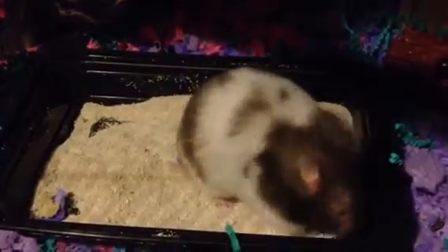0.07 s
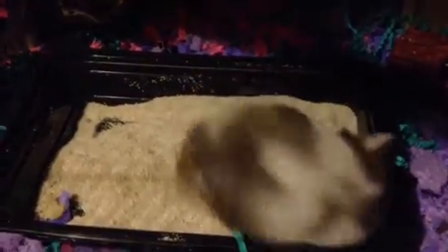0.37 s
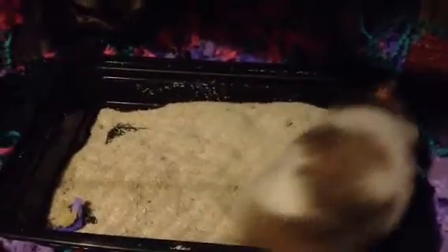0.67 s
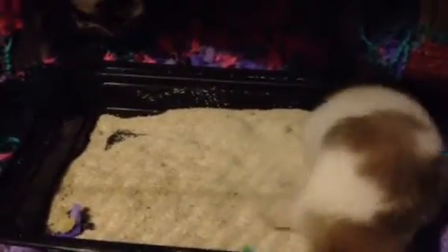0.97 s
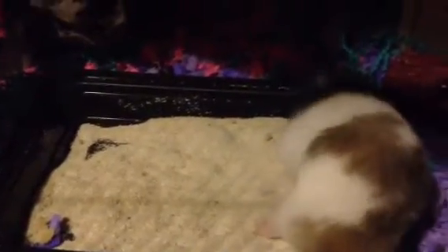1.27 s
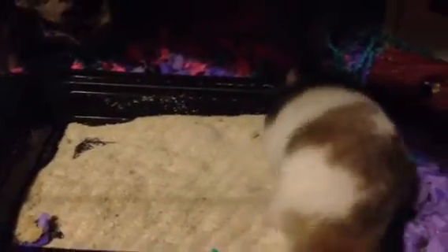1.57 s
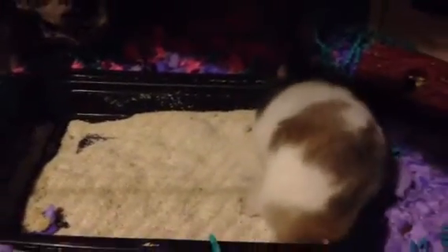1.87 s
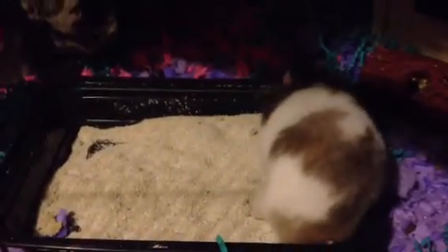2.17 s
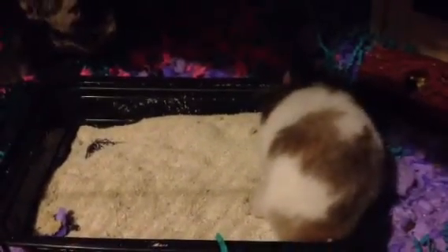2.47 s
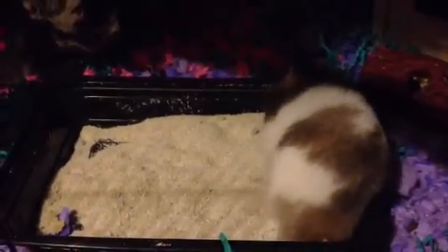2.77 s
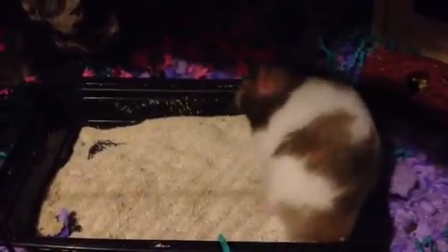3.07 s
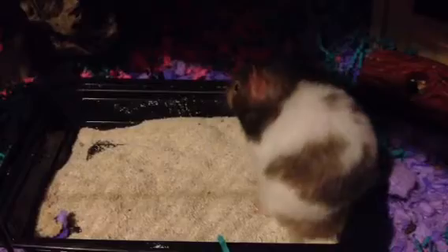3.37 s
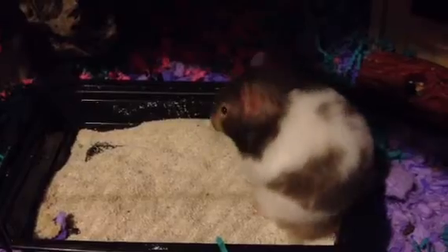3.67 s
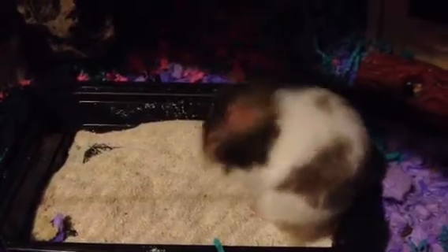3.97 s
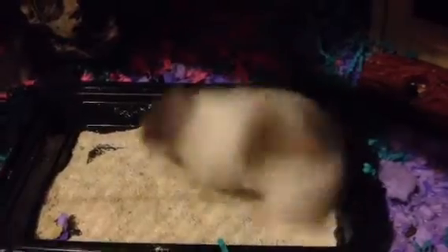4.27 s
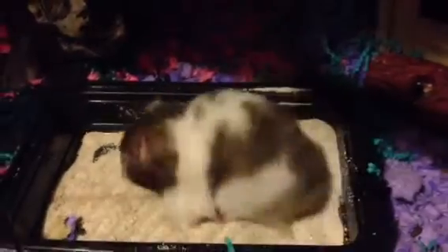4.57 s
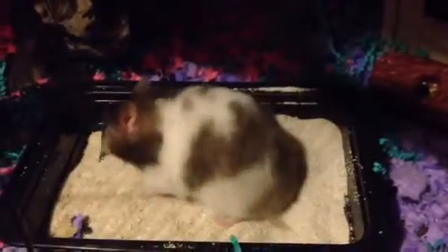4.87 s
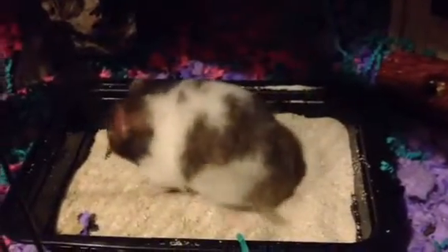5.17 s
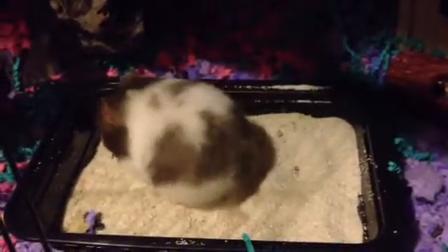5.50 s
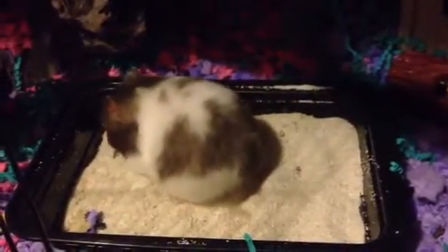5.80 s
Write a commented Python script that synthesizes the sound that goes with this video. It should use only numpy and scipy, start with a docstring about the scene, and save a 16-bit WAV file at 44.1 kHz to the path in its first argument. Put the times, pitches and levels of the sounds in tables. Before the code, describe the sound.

A hamster moves about in a thin plastic tray of dry sand, heard close up in a quiet room with a faint steady hiss. From about 0.3 to 1.3 seconds its feet push the sand in short, grainy swishes, with light claw ticks on the plastic and a sharper click near 1.4. At 1.6 seconds the tray buckles with a brief crackle and thump, the loudest sound, along with a rush of sand. After a lull, softer hollow knocks come irregularly from 2.6 to 4 seconds, mixed with faint rustling and a few clicks. Around 4.3 to 4.5 seconds the animal digs hardest, in a quick flurry of bright, hissing scrapes, followed by lighter scratches and sprinkling grains until 5. A last cluster of knocks and claw clicks falls between 5.2 and 5.4 seconds, and the sand dies away by 6.

```python
"""A hamster shuffles in a plastic tray of dry sand, close to the microphone in a quiet room.
First its feet push the sand into a hiss of tiny collisions while its claws tick on the plastic.
At 1.6 s the thin tray buckles under its weight with a loud crackle; softer knocks follow from 2.6 s.
Near 4.4 s it digs hardest, and after a last cluster of knocks at 5.4 s the sand dies away."""
import sys
import numpy as np
from scipy import signal
from scipy.fft import rfft, irfft
from scipy.io import wavfile
from scipy.ndimage import uniform_filter1d

SR = 44100
rng = np.random.default_rng(int(sys.argv[2]) if len(sys.argv) > 2 else 0)


def to_wav(s):
    """Save 16-bit WAV."""
    ch = np.atleast_2d(s).T  # columns
    pcm = np.round(np.clip(ch, -1, 1) * 32767)  # PCM
    wavfile.write(sys.argv[1], SR, pcm.astype(np.int16))


N = 266275

# A paw or the flank pushes the sand; packed sand throws less spray. Each row: middle in seconds,
# length in seconds, relative level in dB, offset of the tray drumming in dB, offset of the spray in dB.
SAND_STROKES = [(.28, 0.49, -65, -5, -7), (0.4, 0.21, -60, -2.5, -4), (0.502, 0.15, -51.5, -3.5, -5),
                (0.615, 0.084, -46, -6.5, -25), (0.673, 0.052, -44.5, -7.5, -20),
                (0.732, 0.078, -58, 3.5, -14), (0.822, .06, -56, -1.5, -5), (0.927, 0.082, -47.5, -4.5, 0),
                (0.99, 0.1, -53, -5, -3.5), (1.08, 0.023, -58, -3, -7), (1.109, 0.043, -51.5, -3, -3),
                (1.159, 0.027, -48, -3, 0), (1.203, 0.049, -59, -1.5, -2), (1.25, 0.019, -65, 7, -5),
                (1.336, 0.083, -63, -5, -6), (1.533, 0.13, -57.5, -1, -6), (1.647, 0.056, -43, -15, -2),
                (1.712, 0.06, -45.5, -4, 0), (1.86, 0.093, -61.5, -13, 1), (1.94, 0.16, -64.5, -6, 2.5),
                (2.67, .06, -64, 1, 1), (2.823, 0.05, -57.5, 2, -10), (2.889, 0.023, -65, 0, 3),
                (3.026, 0.13, -63.5, -0.5, -9), (3.297, 0.38, -69.5, 1.5, -11),
                (3.41, 0.066, -59.5, 4, -22), (3.484, 0.024, -66.5, -10, 4.5),
                (3.885, 0.064, -63.5, -1.5, -14), (4.18, 0.12, -63.5, 4.5, -14),
                (4.273, 0.072, -47.5, -3.5, -11), (4.322, 0.051, -42.5, -0.5, 5),
                (4.347, 0.024, -35, -5, -2), (4.387, 0.036, -36, -4.5, -1), (4.415, 0.026, -37, 0, -2),
                (4.459, 0.044, -36, -3, 0), (4.51, 0.13, -57, -6, 6.5), (4.626, 0.086, -60.5, -5, 3),
                (4.701, 0.043, -51.5, -5, 5), (4.777, 0.048, -57, -2, -3), (4.83, 0.12, -65, -2.5, 0),
                (4.948, 0.034, -68.5, -0.5, 3), (5.21, 0.33, -66, -5, -9), (5.343, 0.07, -57.5, 1, -7),
                (5.404, 0.069, -55, -5, -20), (5.574, 0.14, -68, -1.5, -3), (5.825, 1, -73, -15, 0)]
# Spectra of grain hiss, fine spray and grains drumming on the tray. Each row: frequency in Hz, gain in dB.
HISS_SPECTRUM = [(1000, -18.5), (2400, -6), (3800, 1), (5000, 0.5), (7600, -0.5), (9600, -6.5),
                 (12000, -4.5), (15500, -3)]
SPRAY_SPECTRUM = [(3000, -34.5), (8000, -8), (9600, -10.5), (12000, -2.5), (15500, -7)]
DRUMMING_SPECTRUM = [(100, -17), (220, -10), (480, -12), (620, -2.5), (770, 1.5), (900, -1.5), (1080, -5.5),
                     (1280, -4.5), (1500, -7.5), (1740, 0), (2300, -4), (2900, -15), (5000, -18.5)]
# Near reflections that make the sand sound hollow. Each row: delay in seconds, signed gain.
NEAR_REFLECTIONS = [(.000318, -0.29), (.00066, -0.11), (.00095, -.07), (.0028, 0.13)]
# The tray knocks or buckles. Each row: start in seconds, thump level in dB, thump pitch in Hz,
# wall level in dB, crack level in dB.
TRAY_KNOCKS = [(0.356, -59, 324, -64, -61), (0.381, -62, 275, -82, -80), (.829, -61, 340, -64.5, -72),
               (1.587, -40, 450, -43, -46), (1.615, -43, 366, -31.5, -35), (1.6256, -49, 400, -27.5, -26.5),
               (1.631, -44, 330, -29.5, -31), (1.638, -47.5, 423, -31, -46), (2.647, -78, 400, -58, -69),
               (2.707, -63.5, 404, -59.5, -83), (2.758, -39.5, 285, -43.5, -46.5),
               (2.773, -41.5, 447, -45, -73), (2.862, -50, 418, -58, -70), (2.922, -64, 420, -63.5, -68.5),
               (2.964, -54.5, 477, -66, -81), (3.125, -60, 326, -85, -82), (3.244, -63, 343, -76, -80),
               (3.3042, -45, 395, -52, -78), (3.329, -49.5, 380, -56, -75), (3.6435, -43.5, 368, -53, -50),
               (3.692, -49, 410, -57, -81), (3.877, -58.5, 393, -61, -57), (3.907, -54, 370, -66, -83),
               (3.952, -56.5, 396, -61.5, -70), (4.009, -60.5, 330, -72, -80), (4.372, -53, 300, -44, -55),
               (4.449, -53.5, 370, -53, -41), (4.843, -61.5, 385, -68, -75), (5.197, -52, 420, -65, -73),
               (5.346, -46.5, 360, -75, -66), (5.373, -41.5, 384, -48, -51), (5.391, -53, 378, -43.5, -65),
               (5.42, -52, 420, -43, -55)]
# Claws tick or scrape. Each row: start in seconds, level in dB, spectral tilt in dB per factor e
# of frequency, rise time in seconds.
CLAW_TICKS = [(.502, -55, -4, 0.0018), (.536, -48, 18, .0023), (.872, -53, 11, .001),
              (1.078, -54.5, -2, .0015), (1.255, -58, 5, .0008), (1.304, -57, -1, 0.00071),
              (1.409, -57, -7, 0.00055), (1.447, -40.5, -4, 0.000084), (1.756, -55, 2, 0.00035),
              (2.807, -54, 3, 0.00073), (3.0336, -43.5, -4.5, 0.00064), (3.215, -52, -2.5, .0025),
              (4.0325, -46, -6, .0002), (4.1823, -41, -1.5, 0.00055), (4.302, -40, 5, 0.0022),
              (4.681, -59, 13, .001), (4.693, -43, 22, 0.0012), (4.709, -43, 14, .001),
              (4.8618, -52, 12, .0004), (4.887, -51, 16, .0005), (5.188, -59, -6.5, .001),
              (5.2066, -40, -4, 0.00084), (5.3262, -47.5, -6.5, .004), (5.37, -45.5, -6, .001),
              (5.521, -54.5, -5.5, .0002), (5.639, -58.5, 2.5, 0.00079)]
# Spectra of bottom thump, wall flexure, crack and claw click. Each row: frequency in Hz, gain in dB.
THUMP_SPECTRUM = [(40, -34), (120, -34), (230, -9.5), (400, 1), (540, -5.5), (750, -16), (1500, -47.5)]  # shifted to the pitch of each knock
FLEX_SPECTRUM = [(200, -44), (400, 3.5), (700, -5.5), (1100, 5.5), (1450, -1), (1850, 5.5), (2500, -4),
                 (3300, -19.5), (5000, -21)]
CRACK_SPECTRUM = [(600, -24.5), (2000, -2.5), (3100, 6), (4400, -5.5), (6000, -1.5), (7600, 4),
                  (9500, -1.5), (12000, -1.5), (15500, -3)]
CLAW_SPECTRUM = [(300, -32), (800, -15), (1300, -10), (1850, 2), (2500, -2.5), (3400, 1.5), (4300, -4.5),
                 (5400, 1.5), (7200, 1.5), (8400, 1.5), (9100, 4), (10200, -3.5), (13000, 2), (15500, 4)]
# Normal modes of the sand-loaded bottom, the free walls and the stiff rim.
# Each row: frequency in Hz, relative level in dB, time to decay by 60 dB in seconds.
BOTTOM_MODES = [(167.8, -39.5, 0.6), (214.4, -7, 0.092), (271.5, -6, 0.23), (340, 1.5, 0.11),
                (386.2, 1, 0.23), (434.5, -1, 0.033), (500, -16.5, 0.098), (554, 1, 0.17),
                (710, -9.5, 0.11)]
WALL_MODES = [(780, -17.5, .12), (986, 5.5, 0.081), (1074, 6.5, 0.047), (1182, 0, .12), (1261, 0, 0.18),
              (1367, 1.5, 0.071), (1495, -7, .16), (1738, 1.5, 0.12), (1885, -6.5, 0.11),
              (1914, -21.5, 0.083), (2070, -2, 0.078), (2165, -4.5, 0.081), (2414, -6.5, 0.13),
              (2760, -14.5, .13), (3460, -17.5, 0.16)]
RIM_MODES = [(1295, 1, 0.066), (1540, -8, 0.16), (1744, 4, 0.045), (1824, -5, 0.076), (2110, 3.5, 0.049),
             (3460, -7, 0.033), (6060, 4, 0.035), (7250, 4.5, 0.041), (9100, 3.5, 0.038)]
# Spectrum of air noise and microphone hiss. Each row: frequency in Hz, gain in dB.
BACKGROUND_SPECTRUM = [(25, -25.5), (60, -12.5), (96, -17), (126, -5), (160, -7.5), (193, 1), (235, -6),
                       (380, -9), (540, -8.5), (700, -13), (1450, -16), (3000, -19.5), (7500, -22),
                       (9600, -24.5), (14000, -21), (15500, -22)]

STROKE_EDGE_DB, STROKE_ROUNDNESS = -8.5, 1.42  # roundness 1 gives a pointed top, 2 a round one
TRICKLE_DB, TRICKLE_T60_S = -14.5, 0.35
TICK_ECHO_S, TICK_ECHO_DB, TICK_ECHO_TOP_HZ = 0.033, -14, 6000
CONTACT_SPREAD_DB = 2.5
HIT_T = np.arange(SR // 3) / SR


def sand():
    """Granular flow: sand yields in small slips, and colliding grains hiss and drum on the tray."""
    hiss_flow, tray_flow, spray_flow = sand_flow()
    slips_db = 1.4 * wander(per_s=120)
    hiss = unit_rms(colour(collisions(per_s=16000), HISS_SPECTRUM))
    spray = unit_rms(colour(collisions(per_s=1400), SPRAY_SPECTRUM))
    drumming = colour(collisions(per_s=5000), DRUMMING_SPECTRUM)
    walls = signal.fftconvolve(drumming, ring(WALL_MODES, rise=0.0013))[:N]
    tray = unit_rms(drumming) + undb(-13) * unit_rms(walls)
    airborne = hiss_flow * hiss + spray_flow * spray
    return undb(slips_db) * (undb(-3) * airborne + undb(-3.5) * tray_flow * tray)


def sand_flow():
    """Incoherent sources add in power: each stroke swells, fades and leaves loose grains trickling."""
    t = np.arange(N) / SR
    power = np.zeros((3, N))
    for middle, length, hiss_db, tray_db, spray_db in SAND_STROKES:
        near = slice(*np.searchsorted(t, [middle - 2 * length, middle + 2 * length + TRICKLE_T60_S]))
        since = t[near] - middle
        push = undb(STROKE_EDGE_DB * np.abs(2 * since / length) ** STROKE_ROUNDNESS)
        trickle = (since > 0) * undb(TRICKLE_DB) * decay(TRICKLE_T60_S, np.abs(since))
        gains = undb([hiss_db, hiss_db + tray_db, hiss_db + spray_db])
        power[:, near] += np.outer(gains, np.maximum(push, trickle)) ** 2
    return np.sqrt(power)


def collisions(per_s):
    """Shot noise: grains strike independently at random times, many weakly and a few strongly."""
    sizes = impact_sizes(N, spread_db=2.2)
    return unit_rms(rng.standard_normal(N) * sizes * (rng.random(N) < per_s / SR))


def hollow(x):
    """Comb filtering: reflections within three milliseconds interfere with the direct sound."""
    hz = np.fft.rfftfreq(N, 1 / SR)
    reflected = sum(gain * np.exp(-2j * np.pi * hz * delay) for delay, gain in NEAR_REFLECTIONS)
    return irfft(rfft(x) * (1 + reflected), N)


def tray_knocks():
    """Plate vibration under a sudden load: the bottom thumps, the walls ring, the plastic cracks."""
    out = np.zeros(N)
    for start, thump_db, thump_hz, wall_db, crack_db in TRAY_KNOCKS:
        # The pitch depends on where the weight lands.
        spectrum = [(hz * thump_hz / 400, db) for hz, db in THUMP_SPECTRUM]
        bottom = at_level(burst(spectrum, t60=0.031, rise=0.0018), 0)
        bottom += at_level(ring(BOTTOM_MODES, rise=0.00096), -4.5)
        walls = at_level(burst(FLEX_SPECTRUM, t60=0.043, rise=0.0017), 0)
        walls += at_level(ring(WALL_MODES, rise=0.00115), -2)
        tilt = np.clip((crack_db - wall_db) / 2, -8, 0)  # a hard snap is brighter
        crack = burst(tilted(CRACK_SPECTRUM, tilt, spread_db=3), t60=0.046, rise=0.001, spread_db=3)
        add(out, start, at_level(bottom, thump_db) + at_level(walls, wall_db) + at_level(crack, crack_db))
    return out


def claw_ticks():
    """Impact excitation: a hard claw clicks and rings the rim; a scrape rises and fades more slowly."""
    out = np.zeros(N)
    for start, level_db, tilt, rise in CLAW_TICKS:
        click = burst(tilted(CLAW_SPECTRUM, tilt, spread_db=3.5), t60=0.027 + 4 * rise, rise=rise)
        rim = ring(RIM_MODES, rise=0.00085)
        add(out, start, at_level(click, level_db) + at_level(rim, level_db - 13.5 - tilt))
    echo = signal.lfilter(*signal.butter(2, TICK_ECHO_TOP_HZ, fs=SR), out)
    add(out, TICK_ECHO_S, undb(TICK_ECHO_DB) * echo)
    return out


def ring(modes, rise):
    """Modal superposition: damped sinusoids add, weighted differently at each point of contact."""
    hz, db, t60 = np.transpose(modes)[:, :, None]
    weight, detune, phase = rng.standard_normal((3, len(modes), 1))
    waves = np.sin(2 * np.pi * (hz * (1 + 0.0021 * detune) * HIT_T + phase))
    envelopes = undb(db + CONTACT_SPREAD_DB * weight) * decay(t60)
    return np.sum(envelopes * waves, axis=0) * (1 - np.exp(-HIT_T / rise))


def burst(spectrum, t60, rise, spread_db=0):
    """Modal overlap: crowded, damped vibrations merge into noise; a spread makes snaps stand out."""
    snaps = impact_sizes(len(HIT_T), spread_db)
    envelope = decay(t60) * (1 - np.exp(-HIT_T / rise))
    return colour(rng.standard_normal(len(HIT_T)) * snaps * envelope, spectrum)


def tilted(spectrum, tilt, spread_db):
    """Spectral tilt: a harder contact is brighter, and each spot differs a little."""
    hz, db = np.transpose(spectrum)
    return np.column_stack([hz, db + tilt * np.log(hz / 4000) + spread_db * rng.standard_normal(len(hz))])


def room(x, early_db, late_db):
    """Reverberation: quick echoes from the pen precede a faint tail from the furnished room."""
    early = burst([(150, -10.5), (2000, -3.5), (15000, -3)], t60=0.17, rise=0.0078)
    late = burst([(150, 5), (2000, -6.0), (15000, -8.5)], t60=0.46, rise=0.014)
    echoes = undb(early_db) * early / np.linalg.norm(early) + undb(late_db) * late / np.linalg.norm(late)
    return x + signal.fftconvolve(x, echoes)[:N]


def room_tone():
    """Stationary noise: low air noise and microphone hiss form a steady floor."""
    return undb(-68) * unit_rms(colour(rng.standard_normal(N), BACKGROUND_SPECTRUM))


def colour(x, spectrum, size=2048):
    """Minimum-phase filtering: folding the cepstrum gives a causal response with this spectrum."""
    hz, db = np.transpose(spectrum)
    log_hz = np.log(np.fft.rfftfreq(size, 1 / SR) + 1)
    log_gain = np.log(undb(np.interp(log_hz, np.log(hz), db)))
    cepstrum = irfft(log_gain)[:size // 2]
    cepstrum[1:] *= 2
    response = irfft(np.exp(rfft(cepstrum, size)))
    return signal.fftconvolve(x, response)[:len(x)]


def impact_sizes(count, spread_db):
    """Levels follow a capped exponential distribution, so strong impacts are rare."""
    return undb(spread_db * np.minimum(rng.exponential(size=count), 5))


def wander(per_s):
    """A moving average smooths random steps into a fluctuation of unit rms."""
    hold = int(SR / per_s)
    steps = rng.standard_normal(N)[np.arange(N) // hold]
    return unit_rms(uniform_filter1d(steps, hold))


def decay(t60, t=HIT_T):
    """Exponential damping: the level falls 60 dB in t60 seconds."""
    return np.exp(-np.log(1000) * t / t60)


def undb(db):
    """Amplitude grows tenfold for every 20 dB."""
    return 10 ** (np.asarray(db) / 20)


def unit_rms(x):
    """Normalisation to a mean power of one."""
    return x / np.sqrt(np.mean(x ** 2))


def at_level(x, db):
    """Normalisation of a hit by the rms level of its first 12 ms."""
    return x * undb(db) / np.sqrt(np.mean(x[:512] ** 2))


def add(track, start_s, sound):
    """Superposition: a sound adds to the track from its start time."""
    start = int(start_s * SR)
    track[start:start + len(sound)] += sound[:N - start]


def scene():
    """Sound pressures add: sand, tray and claws radiate into the quiet room."""
    sources = hollow(sand()) + tray_knocks() + claw_ticks()
    return (room(sources, early_db=-13, late_db=-23.5) + room_tone())[None]


def record(dry):
    """Band limiting: the small microphone loses the deep bass and the recorder cuts the top."""
    thin = signal.sosfilt(signal.butter(3, 85, "highpass", fs=SR, output="sos"), dry)
    return signal.sosfilt(signal.ellip(10, .2, 70, 15250, fs=SR, output="sos"), thin)


dry = scene()
out = record(dry)
to_wav(out)
```